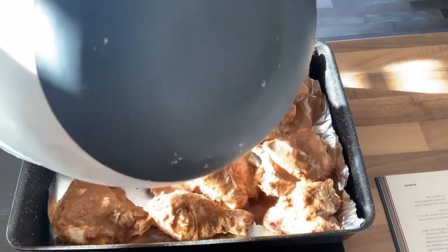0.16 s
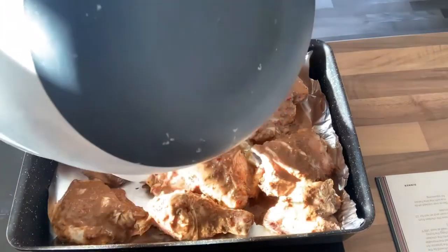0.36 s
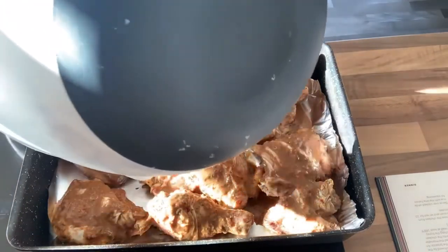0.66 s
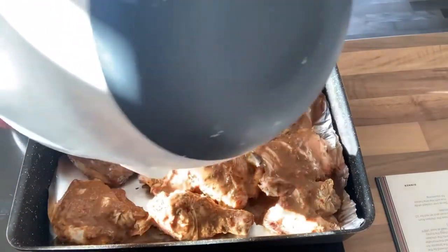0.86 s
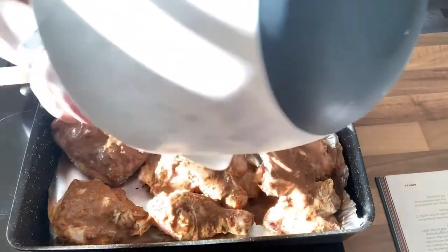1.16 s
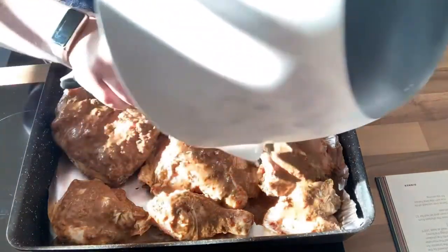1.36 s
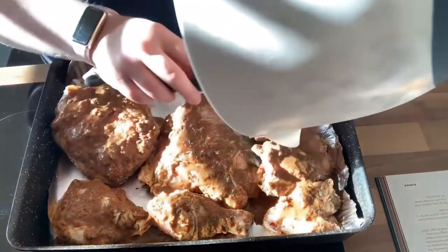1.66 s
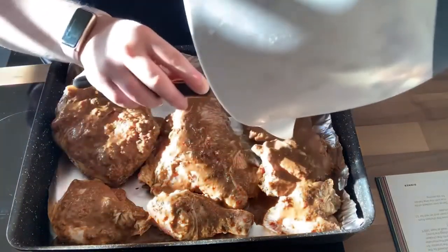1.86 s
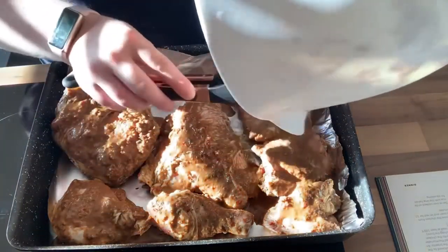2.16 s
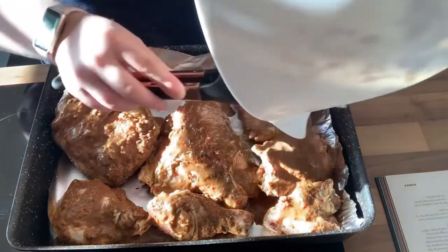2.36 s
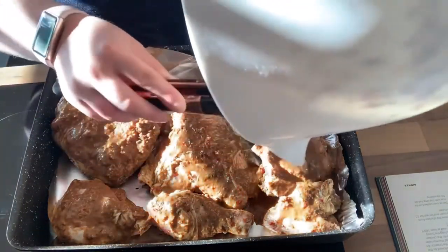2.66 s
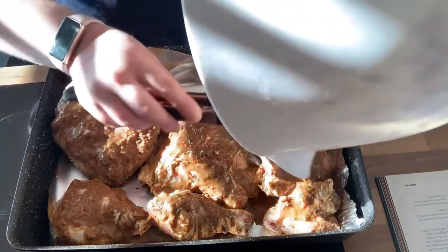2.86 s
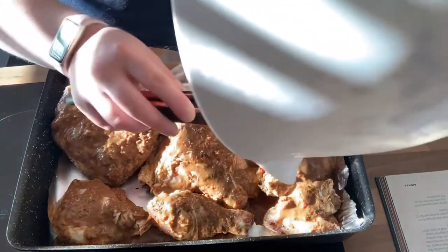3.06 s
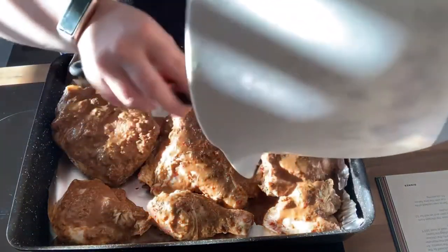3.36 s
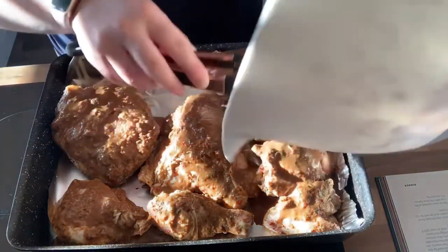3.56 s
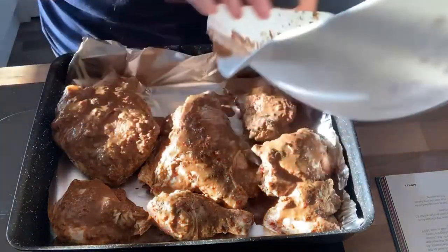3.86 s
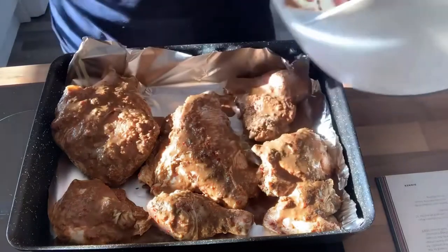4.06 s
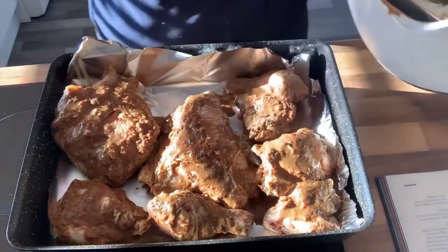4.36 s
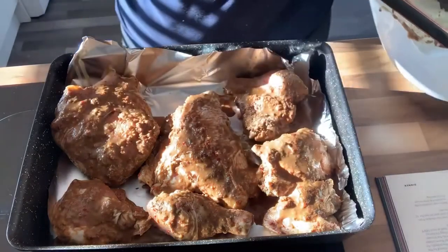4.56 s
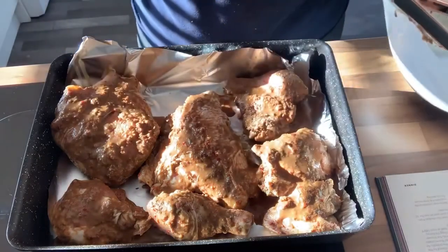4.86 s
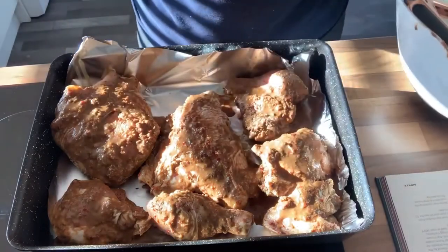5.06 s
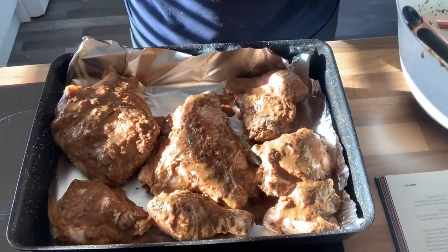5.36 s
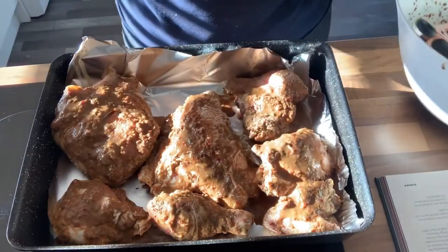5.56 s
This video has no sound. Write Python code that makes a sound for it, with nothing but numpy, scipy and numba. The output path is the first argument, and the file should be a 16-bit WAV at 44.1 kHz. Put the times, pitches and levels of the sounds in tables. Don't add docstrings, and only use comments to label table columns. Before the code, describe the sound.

A low, slightly wavering compressor hum with soft rumble and faint hiss runs throughout a small kitchen, picked up close by a phone. A faint rustle opens. At about 0.36 s tongs tap inside a tilted plastic bowl: a short, hollow, mid-pitched tock with a crisp crack, followed by a dry scrape and light foil and sleeve rustle. A fast double tap comes at 0.78, a hard one at 1.14, then irregular knocks around 1.5, 1.8, 2.1, 2.3, 2.5 and 2.75, some with more wall resonance. A strong cluster hits at 3.09, a cracking double at 3.36, then sharper, lighter clicks at 3.93 and 4.2. Small rebounds and scuffs fill between. At 4.65 the bowl is set on the wooden worktop, nearer the right: a dull clack, a weaker rock at 4.70 and a deep boom fading within half a second. Hum remains, with faint rustles near 5.0 and 5.55.

```python
import sys
import numpy as np
from scipy import signal
from scipy.fft import rfft, irfft
from scipy.io import wavfile
from scipy.ndimage import uniform_filter1d
from numba import njit

SR = 44100
rng = np.random.default_rng(int(sys.argv[2]) if len(sys.argv) > 2 else 0)


def nominal_scale(level):
    x = np.asarray(level, float) / 20
    return 10 ** x


def master_out(mix):
    frames = np.transpose(np.atleast_2d(mix))
    ceiling = np.clip(frames, -1, 1)
    pcm = np.round(ceiling * 32767).astype(np.int16)
    wavfile.write(sys.argv[1], SR, pcm)


N = 250917

# t/s, peak level/dB, hollow f/Hz, crack level/dB, wall level/dB
TAPS = [(0.358, -21, 2316, -27, -18), (0.7821, -22, 2176, -17, -19), (0.7858, -26, 2290, -29.5, -31),
        (1.039, -55, 1444, 4, 6), (1.135, -15, 1658, -10.5, -27), (1.4994, -15, 1619, -20, -29),
        (1.7775, -22.5, 1612, -29.5, -20.5), (2.1023, -15, 1587, -32.5, -20.5),
        (2.106, -21, 2290, -20, -26), (2.28, -24.5, 1722, -20, -11.5), (2.481, -26, 1700, -16.5, -9.5),
        (2.7288, -34.5, 1550, -37, -11.5), (2.8435, -39.5, 1670, -24.5, -3), (3.0875, -22, 1570, -17, -15),
        (3.0915, -10.5, 1602, -16, -34), (3.097, -35, 1700, -33, -21.5), (3.3539, -22.5, 1705, -9.5, -13.5),
        (3.362, -21, 1690, -36.5, -34), (3.9265, -39, 2400, -3, 12), (3.9276, -26, 1790, 1.5, 6),
        (4.2044, -27.5, 2380, -7.5, -13.5), (4.2086, -30.5, 1780, -16, -9.5)]
# t/s, peak level/dB, hollow f/Hz
REBOUNDS = [(0.488, -43, 2140), (0.7907, -41, 1800), (1.142, -45, 1330), (1.1463, -37, 1600),
            (1.518, -37, 1610), (1.8737, -45, 1900), (2.165, -39.5, 1710), (2.7592, -44.5, 1640),
            (2.7879, -38.5, 1640), (4.2146, -36, 1670)]
REBOUND_CRACK_DB, REBOUND_WALL_DB = -18, -21
# t/s, peak level/dB
FLANK_KNOCKS = [
    (0.785, -40),
    (1.136, -32),
    (2.281, -40),
    (2.48, -35),
    (2.728, -45.5),
    (3.354, -38.5),
]
# f/hollow pitch, peak/1, t60/s
HOLLOW_RATIOS = [(1, 2.6, .016), (1.2, .5, .014), (1.52, .4, .02), (1.03, .06, .15)]
# f/Hz, peak/1, t60/s
ARM_JOLT = [(52, .02, .25)]
# f/Hz, level/dB
SHELL = [(500, -30), (1100, -29.5), (1400, 1), (1900, 6), (2500, -5), (3000, -10.5), (4500, -19.5),
         (7000, -61.5)]
# f/Hz, level/dB, t60/s
WALL = [(262, -8.5, 0.093), (356.6, 4, 0.11), (397.2, 0, 0.18), (427.3, -3, 0.14), (477, -6.5, 0.26),
        (647, -21, 0.065)]
# f/Hz, level/dB
FLANK = [(400, -51), (700, 5), (1000, 5), (1300, 3), (1700, -48.5)]
FLANK_DB = -21
# f/Hz, level/dB
CRACK = [(2500, -10), (4000, -4.5), (5500, -5.5), (7500, -9), (8500, -15), (10500, -10.5), (11800, -10.5),
         (12800, -45.5)]
CRACK_DIRECT = 0.24
# t/s, left minus right level/dB
BOWL_PAN = [(0.3, 0), (1.2, -1), (1.5, -4), (1.8, -5.5), (2.5, -3.5), (3.1, -6), (3.5, -5.5), (3.9, -1),
            (4.3, -2.5)]
PORT_LAG_S = .00014
BOWL_ECHO_TURNS, BOWL_ECHO = 1.55, .6

# full from t/s, held t/s, drag level/dB, drag f/Hz, rustle level/dB
STROKES = [(0.06, 0.23, -66, 1630, -80), (0.374, 0.14, -51, 2000, -63), (0.8, .13, -51.5, 1750, -62),
           (1.16, 0.076, -49, 1700, -67), (1.28, 0.035, -84, 1655, -63), (1.52, 0.09, -57, 1575, -68),
           (1.81, 0.072, -54.5, 1600, -67.5), (2.12, .1, -62.5, 1900, -66.5), (2.3, 0.024, -61, 1750, -72),
           (2.76, 0.05, -53.5, 1595, -60), (3.12, 0.057, -54.5, 1650, -61), (3.38, 0.043, -62, 1720, -75),
           (3.64, 0.058, -71.5, 1550, -66), (3.938, 0.071, -51, 1730, -61), (4.223, 0.04, -52, 1800, -91),
           (4.659, 0.052, -63.5, 1810, -77), (5.0, 0.059, -80, 1810, -65), (5.55, 0.048, -70.5, 1580, -67)]
DRAG_RISE_DB_S, DRAG_FALL_DB_S, DRAG_REST_DB, REST_HZ = 500, 154, -73.5, 1640
RUSTLE_RISE_DB_S, RUSTLE_FALL_DB_S, RUSTLE_REST_DB = 300, 122, -74
# f/Hz, level/dB
GRIT = [(300, -23), (900, 15), (2200, 4), (4000, 10.5), (6000, -28.5), (9000, -25.0), (11500, 14.0), (12300, -37)]
# f/Hz, level/dB
RUSTLE = [(2500, -21), (4000, -15), (6000, 1.5), (7200, 7.5), (9000, -2.5), (10500, -18), (12300, -43)]
# f/Hz, level/dB
FOIL = [(6500, -23), (8000, 1), (10000, -4.5), (11700, 0), (12200, -40)]
FOIL_DB = 58.5

# t/s, level/dB
SET_DOWN = [
    (4.654, 3.5),
    (4.702, -11),
]
BOOM_S = 4.657
# f/Hz, signed peak/1, t60/s
WORKTOP = [(72, 0.057, 0.37), (96.8, 0.029, 0.95), (137.8, 0.34, 0.36), (165.8, -0.32, 0.22),
           (218.6, 0.041, 0.22)]
# f/Hz, peak/1, t60/s
FOOT = [(295, 0.037, 0.062), (458, 0.12, 0.067), (690, 0.013, 0.039), (835, 0.0062, 0.21)]
# f/Hz, level/dB
CLACK = [(150, -20), (300, 14.5), (600, 10.5), (1000, 1.5), (1900, 1), (3500, -8.5), (5200, -20.5),
         (6500, -68)]
# f/Hz, level/dB
BOARD = [(20, -33), (60, -3.5), (20000, 8.5)]

# f/Hz, t60/s
ROOM_T60 = [(300, 0.53), (1500, 0.33), (4000, 0.47), (9000, 0.36)]
# f/Hz, rms level/dB
HUM = [(37.7, -67), (75.4, -53), (113.0, -44.5), (188.4, -57.5), (226.1, -70), (274.5, -65), (393.0, -61.5)]
# f/Hz, width/Hz, rms level/dB
CASING = [(140, 26, -61.5), (174.9, 13, -52.5), (278.5, 8.6, -58), (325, 9.2, -57.5), (401.8, 25, -59.5)]
# f/Hz, density level/dB
RUMBLE = [(12, -51), (20, -21), (52, -16), (120, -3.5), (149, -11.5), (340, -17.5), (576, -32), (800, -62)]
# f/Hz, density level/dB
HISS = [(400, -68.5), (576, -68), (642, -26), (913, -38.5), (1300, -37), (3640, -63), (7160, -57),
        (11500, -88)]
AIR_DB = -42
# f/Hz, left-right correlation/1
LIKENESS = [(60, 0.74), (130, 1), (280, 0.49), (600, -0.38), (1290, -0.26), (2770, 0.19), (5000, 0.0059),
            (7500, -0.6)]
# low f/Hz, high f/Hz, threshold against the difference signal level/dB
SUM_GATE = [(4400, 5200, -9), (5200, 6600, -12), (6600, 7600, -11), (7600, 8800, -3.5),
            (8800, 10200, -5.5), (10200, 11700, -12), (11700, 14000, -8)]


def taps():
    body, crack, t = np.zeros((2, N)), np.zeros((2, N)), np.arange(9000) / SR
    rise = 1 - np.exp(-(t / .0011) ** 2)
    rebounds = [(*row, REBOUND_CRACK_DB, REBOUND_WALL_DB) for row in REBOUNDS]
    for s, db, pitch_hz, crack_db, wall_db in TAPS + rebounds:
        grip = 1 + 0.023 * rng.standard_normal(len(WALL))
        wall = ring([(hz * g, nominal_scale(d) / 2, t60) for (hz, d, t60), g in zip(WALL, grip)], size=9000)
        hollow_modes = [(pitch_hz * ratio, peak, t60) for ratio, peak, t60 in HOLLOW_RATIOS]
        hollow = ring(hollow_modes + ARM_JOLT, size=9000)
        shell = nominal_scale(-12) * echo(dense_modes(SHELL, t), pitch_hz)
        flank = nominal_scale(FLANK_DB) * dense_modes(FLANK, t)
        bowl = hollow + nominal_scale(wall_db) * wall + shell + flank
        pan_db = np.interp(s, *np.transpose(BOWL_PAN))
        add(body[0], s + PORT_LAG_S, nominal_scale(db + pan_db / 2) * rise * bowl[0])
        add(body[1], s, nominal_scale(db - pan_db / 2) * rise * bowl[1])

        scuff = unit(shape(rng.standard_normal((2, 600)), SHELL)) * np.exp(-t[:600] / 0.0051)[::-1]
        add(body, s - 600 / SR, nominal_scale(db - 24) * scuff)

        fade = np.exp(-t[:2000] / 0.0041) + 0.016 * np.exp(-t[:2000] / 0.0046)
        burst = rise[:2000] * fade * rng.standard_normal((2, 2000))
        add(crack, s - .0005, nominal_scale(db + crack_db + 12) * echo(burst, pitch_hz))
    for s, db in FLANK_KNOCKS:
        add(body, s, nominal_scale(db) * rise * dense_modes(FLANK, t))
    crack = shape(crack, CRACK)
    return body + spread(crack) + CRACK_DIRECT * crack[0]


def echo(x, pitch_hz):
    lag = int(SR * BOWL_ECHO_TURNS / pitch_hz * (1 + .04 * rng.standard_normal()))
    return x - BOWL_ECHO * np.pad(x, ((0, 0), (lag, 0)))[:, :x.shape[1]]


def dense_modes(table, t):
    fade = np.exp(-t / 0.0061) + 0.33 * np.exp(-t / 0.031)
    return unit(shape(rng.standard_normal((2, len(t))), table)) * fade


def drag():
    drag_db, stroke_hz, rustle_db = np.transpose(STROKES)[2:]
    power, rest = stroke(drag_db, DRAG_RISE_DB_S, DRAG_FALL_DB_S), nominal_scale(DRAG_REST_DB) ** 2
    force = power.sum(axis=0) + rest
    pitch_hz = (stroke_hz @ power + REST_HZ * rest) / force
    stir = stroke(rustle_db, RUSTLE_RISE_DB_S, RUSTLE_FALL_DB_S).sum(axis=0) + nominal_scale(RUSTLE_REST_DB) ** 2

    slips = rng.standard_normal((2, N)) * nominal_scale(3.0 * walk(150) + 1.5 * walk(30))
    hollow = np.array([unit(band(x, pitch_hz, 490.0)) for x in slips])
    grit = unit(spread(shape(echo(slips, REST_HZ), GRIT)))
    rub = np.sqrt(force) * nominal_scale([[-1.5], [1.5]]) * (hollow + nominal_scale(-6.5) * grit)

    rustle = unit(spread(shape(rng.standard_normal((2, N)) * nominal_scale(0.8 * walk(46)), RUSTLE)))
    foil = unit(spread(shape(rng.standard_normal((2, N)) * nominal_scale(7.6 * walk(42)), FOIL)))
    return rub + np.sqrt(stir) * rustle + nominal_scale(FOIL_DB) * stir * foil


def stroke(db, rise_db_s, fall_db_s):
    t, (s, held) = np.arange(N) / SR, np.transpose(STROKES)[:2, :, None]
    swell_db = rise_db_s * np.maximum(s - t, 0)
    fall_db = fall_db_s * np.maximum(t - s - held, 0)
    return nominal_scale(db[:, None] - swell_db - fall_db) ** 2


def set_down():
    thud, clack, t = np.zeros(N), np.zeros((2, N)), np.arange(5000) / SR
    add(thud, BOOM_S, np.convolve(ring(WORKTOP, size=20000), np.hanning(120) / 60))
    for s, db in SET_DOWN:
        add(thud, s, nominal_scale(db) * ring(FOOT, size=5000) * (1 - np.exp(-t / 0.0061)))
        add(clack, s, nominal_scale(db - 37.0) * dense_modes(CLACK, t / 3.24))
    thud = shape(thud, BOARD)
    ports = np.array([nominal_scale(0.4) * np.roll(thud, shift=9), nominal_scale(1.5) * thud])
    return ports + clack + room(clack, wet_db=-36.5)


def room(x, wet_db):
    t, tail = np.arange(22050) / SR, 0
    for hz in 250 * 2. ** np.arange(6):
        t60 = np.interp(hz, *np.transpose(ROOM_T60))
        octave = [(hz / 2, -40), (hz / 1.496, 0), (hz * 1.26, 0), (hz * 2, -40)]
        decay = np.pad(1000 ** (-t / t60) * (t > .004), (0, N - len(t)))
        tail = tail + shape(rng.standard_normal((2, N)), octave) * decay
    tail = spread(tail)[:, :len(t)]
    return nominal_scale(wet_db) * signal.fftconvolve(x.mean(axis=0)[None], tail, axes=1)[:, :N]


def kitchen():
    t = np.arange(N) / SR
    lines, casing = 0, 0
    for hz, db in HUM:
        level = nominal_scale(db + 0.58 * walk(5.4)) * np.sqrt(2)
        lines = lines + level * np.sin(2 * np.pi * (hz * t + rng.random()) + 0.16 * walk(6.2))
    for hz, width_hz, db in CASING:
        noise = rng.standard_normal((2, N))
        casing = casing + nominal_scale(db) * unit([band(x, np.full(N, 1. * hz), 1. * width_hz) for x in noise])
    air = sum(shape(rng.standard_normal((2, N)), table) for table in (RUMBLE, HISS))
    air = unit(spread(air))
    return lines + spread(casing) + nominal_scale(AIR_DB - 6.0) * air * nominal_scale(1.5 * walk(3.22))


def shape(x, table):
    hz, db = np.transpose(table)
    f = np.log(np.fft.rfftfreq(x.shape[-1], 1 / SR) + 1)
    return irfft(rfft(x) * nominal_scale(np.interp(f, np.log(hz), db)), x.shape[-1])


def spread(pair):
    hz, c = np.transpose(LIKENESS)
    c = np.clip(np.interp(np.log(np.fft.rfftfreq(N, 1 / SR) + 1), np.log(hz), c), -1, 1)
    mid, side = rfft(pair) * np.sqrt([(1 + c) / 2, (1 - c) / 2])
    return irfft([mid + side, mid - side], N)


def unit(x):
    return x / np.sqrt(np.mean(np.square(x)))


def ring(modes, size):
    hz, peak, t60 = np.transpose(modes)[:, :, None]
    t = np.arange(size) / SR
    return (peak * np.sin(2 * np.pi * hz * t) * 1000 ** (-t / t60)).sum(axis=0)


def add(out, s, x):
    i = int(s * SR)
    out[..., i:i + x.shape[-1]] += x[..., :N - i]


def walk(rate_hz):
    k = int(SR / rate_hz)
    held = np.repeat(rng.standard_normal(N // k + 1), k)
    return unit(uniform_filter1d(held, k)[:N])


@njit
def band(x, hz, width_hz):
    y, b, l = np.empty(len(x)), 0., 0.
    for i in range(len(x)):
        g, k = np.tan(np.pi * hz[i] / SR), width_hz / hz[i]
        v = (b + g * (x[i] - l)) / (1 + g * (g + k))
        b, l, y[i] = 2 * v - b, l + 2 * g * v, k * v
    return y


def scene():
    hits = taps()
    return hits + drag() + set_down() + room(hits, wet_db=-36.5) + kitchen()


def gate_sum(x):
    f, _, (mid, side) = signal.stft([x[0] + x[1], x[0] - x[1]], SR, nperseg=1024)
    for low_hz, high_hz, threshold_db in SUM_GATE:
        rows = (f >= low_hz) & (f < high_hz)
        power = [uniform_filter1d(np.sum(abs(z[rows]) ** 2, axis=0), size=3) for z in (mid, side)]
        drift_db = 5 * uniform_filter1d(rng.standard_normal(mid.shape[1]), size=5)
        mid[rows] *= power[0] > power[1] * nominal_scale(threshold_db + drift_db) ** 2
    return signal.istft([mid + side, mid - side], SR, nperseg=1024)[1][:, :N] / 2


def top_cut(x):
    return signal.sosfilt(signal.butter(12, 12600, fs=SR, output="sos"), x)


def record(dry):
    thinned = gate_sum(dry)
    return top_cut(thinned)


dry = scene()
out = record(dry)
master_out(out)
```